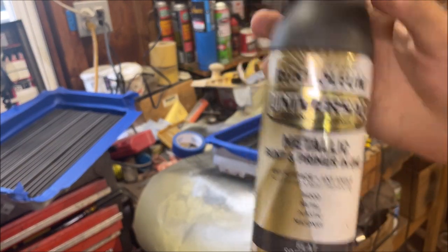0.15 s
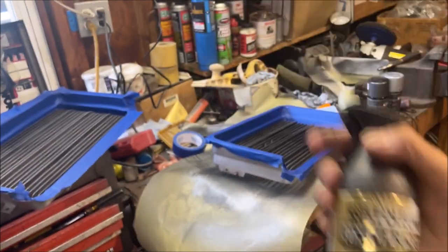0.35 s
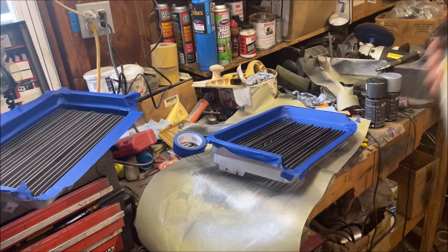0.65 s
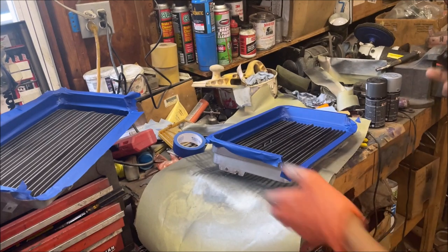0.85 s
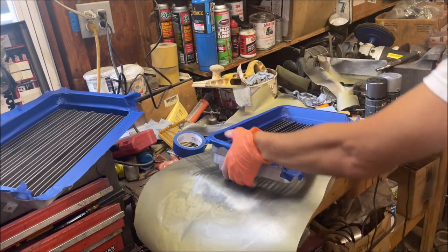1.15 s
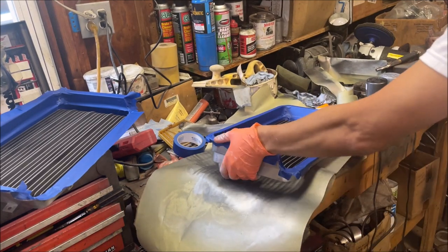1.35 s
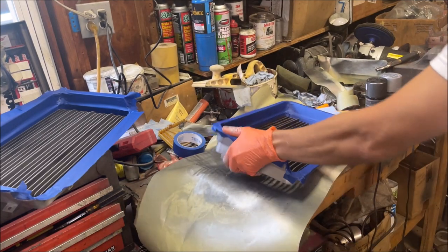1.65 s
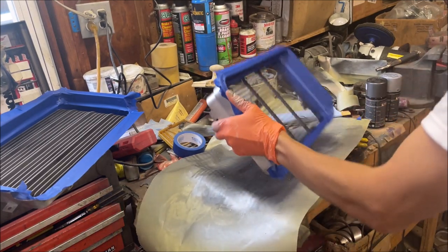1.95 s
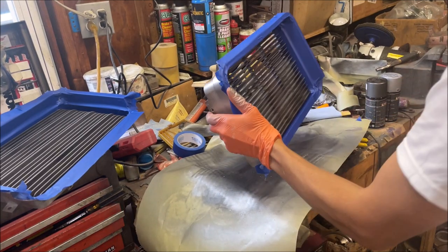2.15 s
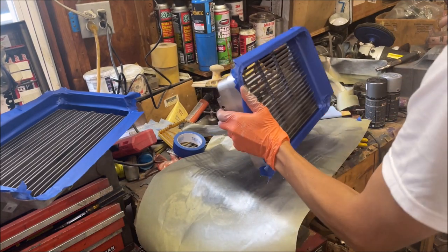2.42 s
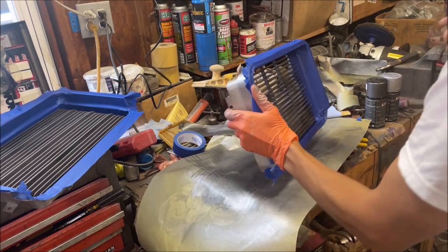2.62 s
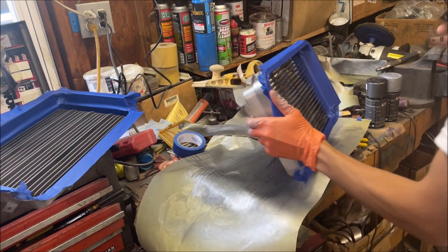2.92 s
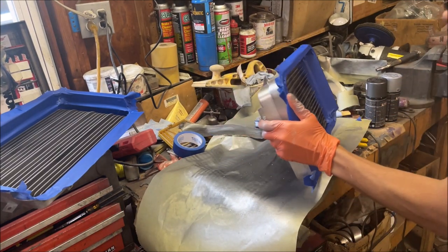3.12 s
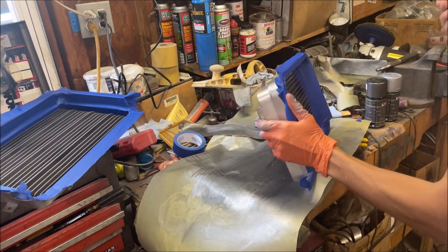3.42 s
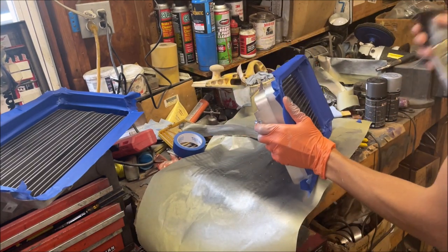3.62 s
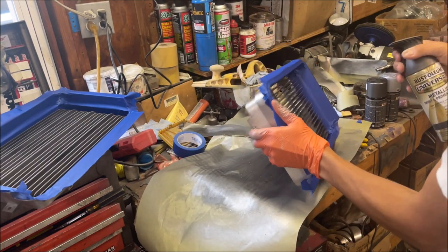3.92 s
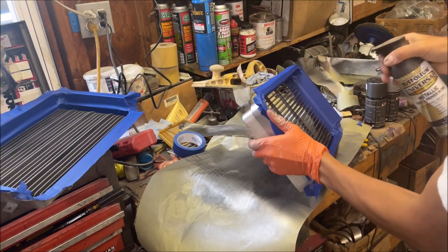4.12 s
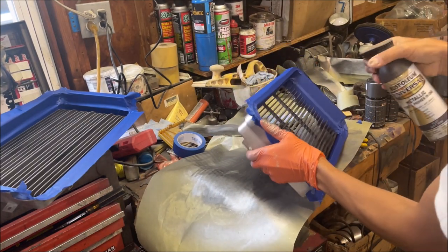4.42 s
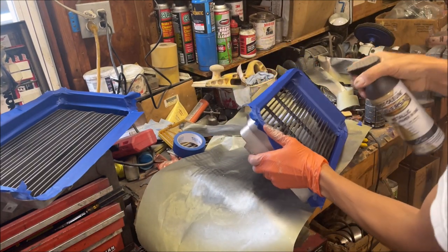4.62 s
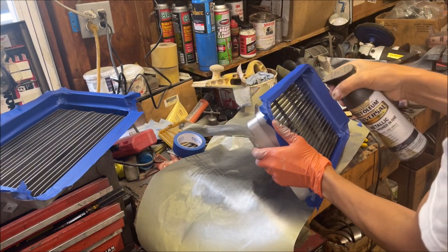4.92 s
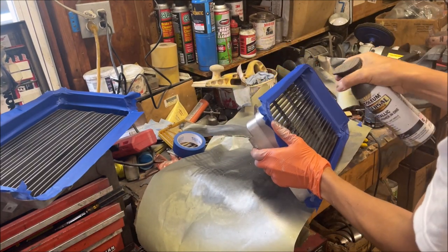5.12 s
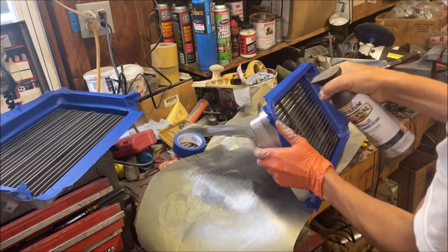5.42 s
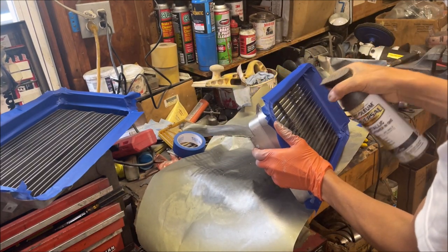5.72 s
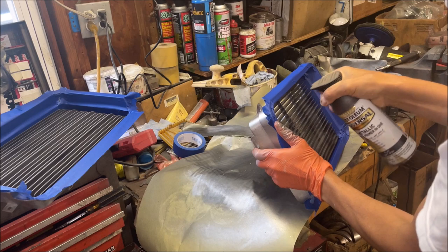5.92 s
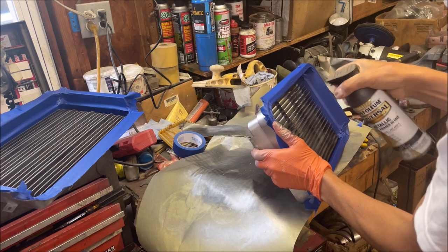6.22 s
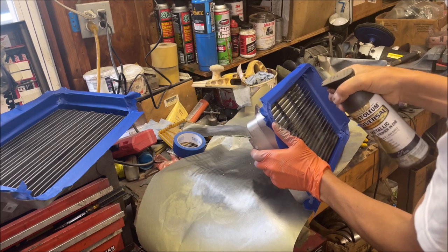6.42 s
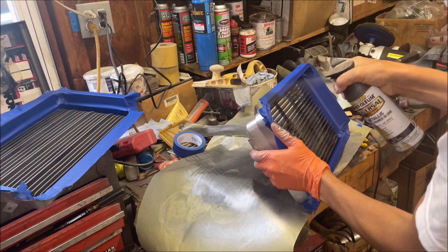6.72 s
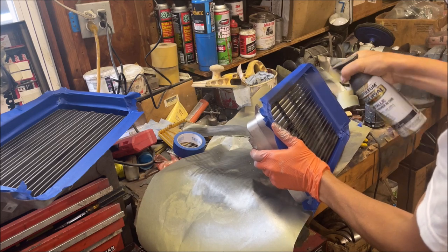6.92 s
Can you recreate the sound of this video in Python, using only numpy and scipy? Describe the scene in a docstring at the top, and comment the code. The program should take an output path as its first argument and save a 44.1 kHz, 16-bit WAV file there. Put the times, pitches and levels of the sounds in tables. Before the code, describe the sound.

In a workshop with a steady low hum, someone handles a can of spray paint near the microphone, after a brief dull rush of noise. They shake it, making an uneven metallic rattle with wet sloshing that weakens toward the end. Small clicks from fingers and trigger follow, then two faint puffs of spray and a stronger, longer hiss with a slight whistle.

```python
"""A dull rush fades off to the right, over a workshop's rumble and machine hum; a hand slides on a can.
The spray can is shaken: its mixing ball knocks on the paint-damped steel ends, the paint sloshes
and plops. Then the trigger ticks and three bursts of spray hiss onto a tray, the last faintly
whistling. Left and right carry much the same bass and treble, the treble a little apart in time."""
import sys
import numpy as np
from scipy import signal
from scipy.fft import rfft, irfft, next_fast_len
from scipy.io import wavfile

SR = 44100
rng = np.random.default_rng(int(sys.argv[2]) if len(sys.argv) > 2 else 0)


def inscribe(sig):
    """Save sig as 16-bit PCM at rate SR to the path in sys.argv[1].

    A 1-D sig is mono; a 2-D sig holds one channel per row.
    Samples are clipped to [-1, 1] before scaling.
    """
    pcm = np.round(np.clip(np.atleast_2d(sig).T, -1, 1) * 32767)
    wavfile.write(sys.argv[1], SR, pcm.astype(np.int16))


N = 311346


def from_db(db):
    """Gain of a level in dB."""
    return 10 ** (np.asarray(db) / 20)


def rms_one(x):
    """Scaled to rms 1."""
    return x / np.sqrt(np.mean(x ** 2) + 1e-20)


def in_time(rows):
    """Each column of a timed curve at every sample."""
    seconds, *columns = np.transpose(rows)
    return [np.interp(np.arange(N) / SR, seconds, column) for column in columns]


def at_hz(points, hz):
    """A table read on a log-frequency axis."""
    known_hz, values = np.transpose(points)
    return np.interp(np.log(hz), np.log(known_hz), values)


def drift(rate_hz):
    """A slow random wander of rms 1."""
    pole = np.exp(-80 * np.pi * rate_hz / SR)   # one step every 40 samples
    slow = signal.lfilter([1], [1, -2 * pole, pole * pole], rng.standard_normal(N // 40 + 2002))[2000:]
    return np.interp(np.arange(N) / 40, np.arange(len(slow)), rms_one(slow))


def dying(length, t60):
    """An exponential fall of 60 dB in t60 seconds."""
    return from_db(-60 * np.arange(length) / (t60 * SR))


def bank(drive, lowest_hz, part=slice(None)):
    """Band-passes fed by drive(hz, noise), summed with alternating signs so a click stays whole."""
    edges_hz = 30 * 2 ** np.arange(0, 9.4, .4)
    out = np.zeros((2, N))
    white = rng.standard_normal((2,) + out[:, part].shape)
    for k, (low, high) in enumerate(zip(edges_hz, edges_hz[1:])):
        if high > lowest_hz:
            band = signal.butter(2, [low, high], "band", fs=SR, output="sos")
            out[:, part] += (-1) ** k * signal.sosfilt(band, drive(np.sqrt(low * high), white[k % 2]))
    return out


def hiss(curve, colour, gain_db, pivot_hz, patchy_db, texture=1):
    """Coloured noise along a curve of time, level and tilt; each band wanders by patchy_db."""
    part = slice(round(curve[0][0] * SR), round(curve[-1][0] * SR))
    level_db, tilt_db = (column[part] for column in in_time(curve))
    gain = (texture * np.ones(N))[part] * from_db(level_db + gain_db)

    def drive(hz, noise):
        band_db = at_hz(colour, hz) + tilt_db * np.log2(hz / pivot_hz)
        return noise * gain * from_db(band_db + patchy_db * drift(28)[part])

    return bank(drive, 300, part)


def dull_rush():
    """A dull rush of noise off to the right that fades within the first second."""
    # Each row: time in seconds, relative level in dB, tilt in dB per octave.
    curve = [(0, -38, -4.5), (.15, -48.5, -3), (.32, -43, -5), (.5, -51, -5), (.75, -72, -8)]
    # Each row: frequency in Hz, relative noise density in dB.
    colour = [(250, 8), (400, -6), (680, 3), (900, -14), (1300, -3), (2000, -20), (4000, -45)]
    return hiss(curve, colour, gain_db=7.5, pivot_hz=700, patchy_db=0) * from_db([[-9], [0]])


def workshop(rumble_db, patchy_db, waver_db, waver_rad):
    """The room all round the microphone: broad rumble, with motor and mains lines that waver."""
    # Each row: frequency in Hz, relative density of the rumble in dB.
    colour = [(30, -28.5), (48, -8.5), (62, -1), (85, -13), (160, -13.5), (215, -8), (275, -12.5),
              (400, -11.5), (620, -16.5), (800, -15.5), (1500, -27), (2500, -28.5), (4500, -49.5),
              (8000, -50.5), (16000, -58)]
    # Each row: pitch of a hum line in Hz, rms level in dB that it wavers about.
    lines = [(59.3, -60), (69.2, -57.5), (119.7, -59), (138.6, -63), (177.9, -57), (207.6, -72),
             (224, -65.5), (237.6, -61.5), (296.2, -69.5), (342, -67), (357, -70), (468, -68), (588, -71),
             (709, -69)]
    rumble = bank(lambda hz, noise: noise * from_db(at_hz(colour, hz) + patchy_db * drift(6.7)), 0)
    t, hum = np.arange(N) / SR, np.zeros(N)
    for hz, db in lines:
        size = np.sqrt(2) * from_db(db + waver_db * drift(2.6))
        hum += size * np.sin(2 * np.pi * (hz * t + rng.random()) + waver_rad * drift(1.3))
    return from_db(rumble_db) * rms_one(rumble) + hum


def hand_slide():
    """A hand rubs over the can in a few soft swishes."""
    # Each row: time in seconds, relative level in dB, tilt in dB per octave.
    curve = [(0.05, -85, -9.5), (0.098, -61, 2), (0.14, -73, -6), (0.345, -57, 0), (0.46, -64, 2),
             (0.498, -51, 6), (0.58, -63, -1.5), (0.705, -74.5, 4), (0.8, -55, 4)]
    # Each row: frequency in Hz, relative noise density in dB.
    colour = [(800, -10), (2000, 5), (5000, -0.5), (8000, -0.5), (11000, -7), (16000, -14)]
    return hiss(curve, colour, gain_db=2.5, pivot_hz=6000, patchy_db=3.5)


def finger_ticks(t60=0.027, ping_hz=3180, ping_db=-6, hollow_hz=2250):
    """Hand and trigger tap the can: light, short blows for struck_can."""
    # Each row: start in seconds, relative level in dB, dull and bright parts in dB.
    ticks = [(0.282, -51, -15, -11), (0.35, -41.5, -2, -32), (0.721, -47, -33, -20),
             (5.125, -59.5, -1.5, -4), (5.1844, -57.5, 0, -14), (5.38, -58.5, 4, -24),
             (5.4947, -55, 2, -15), (5.53, -51, -1, -8), (5.5835, -44, 1.5, -24), (5.6302, -46, -2, -28),
             (5.646, -54, -12, -30), (5.659, -59, -14, -30), (5.668, -57, -12.5, -30), (5.878, -73, -4, -7),
             (5.902, -53, -1.5, -26), (5.9459, -55, -1, -17), (6.34, -55, -2, -30), (6.359, -61, -9, -32)]
    return [(start, db, dull_db, dull_db + 1, ping_db, (ping_db + bright_db) / 2, bright_db,
             t60, 0, ping_hz, ping_db, hollow_hz) for start, db, dull_db, bright_db in ticks]


def steel_mode(at, sizes, hz, t60):
    """Clicks set one mode of the can ringing."""
    clicks = np.full(N, 1e-18)
    clicks[at] = sizes
    pole, turn = from_db(-60 / (t60 * SR)), 2 * np.pi * hz / SR
    return signal.lfilter([0, np.sin(turn)], [1, -2 * pole * np.cos(turn), pole * pole], clicks)


def pings(at, levels_db, pitches_hz, spread, t60, held_s):
    """Where a blow lands decides which mode is loudest: a short tone with three weaker neighbours."""
    out, span = np.zeros(N), int(.1 * SR)
    t = np.arange(span) / SR
    shape = dying(span, t60) * (.3 + .7 * np.exp(-(t / held_s) ** 4))   # the paint smothers it
    for i, db, hz, detune in zip(at, levels_db, pitches_hz, rng.standard_normal((len(at), 3, 1))):
        neighbours = np.sin(2 * np.pi * hz * (1 + spread * detune) * t).sum(axis=0)
        tones = np.sin(2 * np.pi * hz * t) + 0.57 * neighbours
        out[i:i + span] += 0.19 * from_db(db) * tones * shape
    return out


def struck_can(blows, crack_db, echo_db, ring_db, room_db, scatter_db):
    """Each blow: a crack and its echo off the bench, the wet steel's damped ring, the room's tail."""
    # Each row: frequency in Hz, relative density of a blow in dB.
    colour = [(450, -12), (800, 4.5), (1400, 5), (2200, 3.5), (3300, 0.5), (4600, -1.5), (6500, 0.5),
              (9000, 6.5), (12000, 4.5), (16000, 6)]
    # Each row: frequency in Hz, factor on a blow's decay time.
    damping = [(400, 2.9), (1500, 1.12), (4000, 2.06), (5800, 0.85), (8000, 0.38), (15000, 0.86)]
    # Each row: pitch of a clear mode in Hz, relative level in dB, seconds to fall 60 dB.
    can_modes = [(1142, -21.5, 0.06), (2140, -16, 0.021), (3310, -40.5, .07), (3990, -23, 0.24),
                 (5030, -20.5, 0.082), (4840, -24, 0.088), (6470, -6, 0.022)]
    # Each row: frequency in Hz, the room's reverberation time in seconds.
    room_t60 = [(400, 0.071), (2000, 0.33), (4500, 0.37), (6500, 0.25), (15000, 0.0515)]
    # Centres in Hz of a blow's dull, low-mid, main, high, top and bright parts.
    part_hz = [1300, 2200, 3356, 5072, 6694, 11100]
    (start, level_db, dull_db, mid_db, high_db, top_db, bright_db,
     t60, hard_db, ping_hz, ping_db, hollow_hz) = np.transpose(blows)
    parts_db = np.array([dull_db, mid_db, np.zeros(len(start)), high_db, top_db, bright_db])
    at = np.round(start * SR).astype(int)
    span, bench_lag = int(.14 * SR), int(.0041 * SR)
    scatter = iter(rng.standard_normal((len(at), 40)).T)
    t = np.arange(span) / SR
    swell = 1 - np.exp(-(t / .0021) ** 2)   # the ring takes a moment to spread over the steel
    swell *= .48 + .52 * np.exp(-(t / .0105) ** 4)   # and drops once the ball stops chattering

    def blow_db(hz):
        shares = [np.interp(np.log(hz), np.log(part_hz), one) for one in np.eye(len(part_hz))]
        return level_db + shares @ parts_db

    def drive(hz, noise):
        sizes = from_db(blow_db(hz) + at_hz(colour, hz) + scatter_db * next(scatter))
        clicks, cracks, ring_power = np.zeros(N), np.zeros(N), np.zeros(N + span)
        clicks[at] = sizes
        cracks[at] = sizes * from_db(crack_db + hard_db - 1.46 * np.log2(hz / 4000))
        for i, size, decay_s in zip(at, sizes, t60):
            ring_power[i:i + span] += (size * swell * dying(span, decay_s * at_hz(damping, hz))) ** 2
        # reflections build up over some milliseconds, then fall with the room's decay
        rise, fall = np.exp(-1 / (.0028 * SR)), from_db(-120 / (at_hz(room_t60, hz) * SR))
        room_power = signal.lfilter([1 - rise], np.convolve([1, -fall], [1, -rise]), clicks ** 2 + 1e-18)
        level = np.sqrt(from_db(ring_db) ** 2 * ring_power[:N] + from_db(room_db) ** 2 * room_power)
        return cracks + from_db(echo_db) * np.roll(cracks, bench_lag) + level * noise

    modes = sum(steel_mode(at, from_db(blow_db(hz) + db + 1.9 * next(scatter)), hz, decay_s)
                for hz, db, decay_s in can_modes)
    after_crack = at + int(.0015 * SR)
    cluster = pings(after_crack, level_db + ping_db + 7, ping_hz, spread=.088, t60=.092, held_s=.011)
    # the crack itself carries a pitch just above the ping
    snap = pings(at, level_db + ping_db - 1.5, 1.11 * ping_hz, spread=.038, t60=.0089, held_s=.05)
    hollow = pings(after_crack, level_db + dull_db + .5, hollow_hz, spread=.078, t60=.18, held_s=.026)
    return bank(drive, 300) + modes + cluster + snap + hollow


def paint_slosh(grains_per_s, grain_db):
    """Paint splashes about inside the can: noise roughened by short grains."""
    # Each row: time in seconds, relative level in dB, tilt in dB per octave.
    curve = [(0.78, -52, -1), (0.86, -49, -0.5), (1.0, -50, -2), (1.13, -31.5, -6), (1.2, -47, -2),
             (1.286, -41, -6), (1.656, -37.5, -4.5), (1.824, -35, -4.5), (1.94, -40.5, -5.5),
             (2.03, -44, -3), (2.19, -44.5, -5), (2.235, -49, -6), (2.32, -37.5, -6.5), (2.41, -43, -3),
             (2.6, -42.5, -3), (2.69, -46, -3), (2.79, -46.5, -3), (2.9, -53.5, -0.5), (3.0, -41.5, -5.5),
             (3.11, -42, -4.5), (3.22, -47, -3.5), (3.33, -47, -1), (3.43, -40, -4), (3.48, -47, -2.5),
             (3.58, -40.5, -4), (3.742, -45.5, -6.5), (4.052, -41.5, -7), (4.28, -55.5, -5.5),
             (4.41, -42, -8.5), (4.55, -55, -7.5), (4.78, -58, -13), (5.0, -77.5, -6)]
    # Each row: frequency in Hz, relative noise density in dB.
    colour = [(350, -17.5), (800, -2.5), (1600, -1.5), (3500, -2), (6000, -3), (9000, -3.5), (16000, -12)]
    born = rng.random(N) < grains_per_s / SR
    sizes = from_db(grain_db * np.minimum(rng.exponential(1, N), 2.5))
    grains = signal.lfilter([1], [1, -.994], born * sizes)
    return hiss(curve, colour, gain_db=2, pivot_hz=1770, patchy_db=3.5, texture=rms_one(2.9 + grains))


def ball_knocks(t60=0.11):
    """The ball's blows for struck_can: the base pings high, the wet shoulder knocks dull."""
    # Each row: start in seconds, relative level in dB, dull, low-mid, high and top parts in dB,
    # contact hardness in dB, ping pitch in Hz, relative ping level in dB, hollow note in Hz.
    knocks = [(0.8115, -19.5, -11.5, -16, -1.5, -1, 0.5, 4780, -0.5, 1014),
              (0.9007, -31.5, 3, 2, -6, -4, 6.5, 3400, -3, 2380),
              (0.9862, -50.5, 4, -4, 4, -6, 5.5, 3220.0, -3, 1380.0),
              (1.0462, -17, -13.5, -12.5, -4.5, -5, 0.5, 4750, -5, 2390),
              (1.1075, -31, 4.5, 3, 1, -10, 0.5, 2850, -10.5, 980),
              (1.1404, -35, 9, 2, -3.5, 1.0, 2.5, 6970, 2, 1235),
              (1.1524, -30, 1, -4.5, -6, -5, 3, 3330, -2, 1270),
              (1.165, -35.5, -2.5, -1, -1, -9.5, 4.5, 3410, -5, 1290),
              (1.2332, -23.5, -10.5, -13, 1.5, -0.5, 0, 3270, -13, 1396),
              (1.2384, -15.5, -19, -16, -15, -10.5, -6.5, 3157, -4.5, 2430),
              (1.278, -26.5, -3, -6, -9, -14, -3.5, 4100.0, -7, 2460),
              (1.3834, -34.5, 5.5, 8.5, -12, -10, 1.5, 3330, -6.5, 2330),
              (1.3878, -31.5, -16.0, -19, -7.5, -2, 3.5, 3300, 1.5, 1560.0),
              (1.4577, -20, -11.5, -9, -9, -5.5, -4.5, 4530, -3.5, 1720.0),
              (1.4627, -14.5, -27.5, -24, -3.5, -6.5, -2, 4620, -8.5, 855),
              (1.5716, -31.5, 5, 3.5, -3, -14.0, -4, 2800, -9.5, 1130),
              (1.6034, -27.5, -0.5, -3, -7, -12.5, -1, 3770, -0.5, 2240),
              (1.6684, -47, -3.5, 4, 3.5, -4.5, 0, 4920.0, -1, 1920.0),
              (1.702, -25, -7, 1, -1.5, 1.5, 1.5, 2700, -13.5, 2350),
              (1.727, -22.5, -30, -7, -1.5, -8.5, -1.5, 3100.0, -8.5, 2430.0),
              (1.868, -32.5, -1.5, 5, -6, -5.5, 1, 3470, -7, 2260),
              (1.965, -20.5, -15.5, -7, 0, 0.5, 1.5, 6000, 0.5, 1980.0),
              (2.15, -32.5, -7, -3, -4.5, -3.5, -1, 2540, -2.5, 2340),
              (2.254, -20, -16, -14.5, -4.5, -2.5, -0.5, 4690, -1.5, 1660),
              (2.3403, -30, -7.5, -3, -18.5, -7, 3.5, 3480, -4, 2340),
              (2.4186, -17.5, -19, -10, -3.5, -6, 3.5, 4040, -12.5, 2480),
              (2.562, -30, -0.5, 0, -24.5, -0.5, -0.5, 3700, -1, 2420),
              (2.6583, -26.5, -13, -5.5, 1.5, 5, 3, 6600, 1.5, 2220),
              (2.7632, -27.5, -1.5, -4.5, -11, -7.5, -1, 3890, -2.5, 2410),
              (2.8537, -20, -19, -10, 2.5, -1.5, 0.5, 4230, -1, 2290.0),
              (2.9841, -30.5, -1.5, -1.5, -12, -2.5, 2, 3580, -9, 774),
              (3.05, -50, 5.5, 14, 5.5, 2, 0.5, 2630, 2.5, 1620),
              (3.078, -17.5, -15, -14.5, 1, -10, 1.5, 4310, 2.0, 1900),
              (3.1767, -29, -2, 5, -12.5, -2.5, 1.5, 2920, -18, 2330),
              (3.28, -17, -18, -9, 1.5, -3.5, 0, 4350, -4, 2140),
              (3.4022, -35, 5, 6.5, 0.5, -1.5, 2.5, 2830, -18.5, 1870),
              (3.5044, -21.5, -15, -8.5, 3.5, 0, -0.5, 5040, 1, 2040),
              (3.6348, -32, 3.5, -5, -12, -1, -11, 3080, -3, 924),
              (3.6464, -29.5, -1, 3, -9, -11, 2, 3490, -8, 2270),
              (3.7, -39, -4.5, -11, 4.5, -13, 7, 3360.0, 5.5, 700),
              (3.8298, -35, -4, -1, 0.5, -1.5, 3, 2970, -2.5, 700),
              (3.9348, -35.5, 4.5, -5, -3, -9, -16, 2620, -14, 894),
              (3.96, -30, -3.5, -11, -4.5, -14.5, 2, 2700, -4, 900),
              (4.0003, -47, -11, 4, 5, -14, 3.5, 3500, -1, 1830.0),
              (4.128, -35.5, 0.5, 2.5, -11, -18, -14, 2840, -7, 795),
              (4.142, -27, -1.5, -12, -4, -7, 1, 3330, -3, 1055),
              (4.205, -39, -0.5, -4, -13, -4, 1.5, 3270, -5.5, 2000),
              (4.4855, -47, -2, 0, -1, -16.5, 1, 2990.0, -5, 2290),
              (4.6178, -41, 1, -3, -0.5, -4, -0.5, 2670, 0.5, 750.0),
              (4.6665, -36, 7, 0, -0.5, -4, -3.5, 2680, 2, 1282),
              (4.8607, -49.5, 14, 6.5, -9, -36, -1.5, 2670, -6, 1235)]
    blows = []
    for start, db, *parts_db, hard_db, ping_hz, ping_db, hollow_hz in knocks:
        bright_db = -22 + 1.75 * hard_db   # a harder contact is brighter
        blows.append((start, db, *parts_db, bright_db, t60, hard_db, ping_hz, ping_db, hollow_hz))
    return blows


def paint_plops(gain_db, spread, splash_db, t60):
    """Paint plops back as the ball turns: three close, short tones in a splash of noise."""
    # Each row: start in seconds, relative level in dB, pitch in Hz.
    plops = [(0.8589, -22, 1478), (0.887, -28, 1560), (.988, -36.5, 1400), (1.007, -30, 1430),
             (1.089, -27.5, 1430), (1.216, -28, 1346), (1.551, -30, 970), (1.787, -35, 1430),
             (1.825, -33.5, 980), (2.008, -31, 1790), (2.074, -27.5, 1670), (2.096, -34, 1740),
             (2.152, -33, 1360), (2.184, -33.5, 1340), (2.2915, -27.5, 1210), (2.292, -26.5, 1970),
             (2.387, -35, 2100), (2.444, -28, 1910), (2.5253, -24.5, 1580), (2.5261, -28, 1070),
             (2.615, -31.5, 1290), (2.637, -31, 1640), (2.709, -33, 1250), (2.725, -31, 1390),
             (2.817, -37.5, 1560), (2.842, -30.5, 1610), (2.937, -33, 2100), (2.938, -34.5, 1100),
             (3.143, -30, 1910), (3.213, -38.5, 1140), (3.271, -30.5, 1920), (3.369, -32.5, 1470),
             (3.3688, -34, 844), (3.461, -38.5, 1190), (3.493, -31.5, 2000), (3.576, -37, 1990),
             (3.595, -33.5, 1140), (3.69, -26, 1476), (3.791, -50, 1630), (4.076, -39.5, 835),
             (4.167, -26, 717)]
    out, span = np.zeros((2, N)), int(.08 * SR)
    t = np.arange(span) / SR
    for (start, db, hz), detune in zip(plops, rng.standard_normal((len(plops), 3, 1))):
        tones = np.sin(2 * np.pi * hz * (1 + spread * detune) * t).mean(axis=0) * dying(span, t60)
        band = signal.butter(2, [hz * .65, hz * 1.4], "band", fs=SR, output="sos")
        splash = signal.sosfilt(band, rng.standard_normal((2, span))) * dying(span, 2 * t60)
        i = round(start * SR)
        out[:, i:i + span] += from_db(db + gain_db) * (tones + from_db(splash_db) * splash)
    return out


def trigger():
    """The jet's level and tilt: each squeeze opens, rises, sags and falls; the strongest is heard."""
    # Each row: start in seconds, rise in seconds, relative peak in dB, hold and fall in seconds.
    squeezes = [(5.416, 0.12, -60.5, 0.047, .14), (5.91, 0.042, -63.5, 0.19, .3),
                (6.419, 0.08, -55, 0.09, 0.26), (6.53, 0.07, -47.5, .45, .1)]
    shut_db, opening_db, opening_s = -91.5, -75, .024
    sag_db_per_s, tilt_per_s = 15, 13.3   # the jet weakens and brightens while held
    release_db, release_s = 2, .026   # letting go drops the jet at once, then it dribbles out
    t = np.arange(squeezes[0][0] - opening_s, N / SR, .002)
    level, tilt = np.full(len(t), shut_db), np.zeros(len(t))
    for start, rise, db, held, fall in squeezes:
        corners = start + np.cumsum([-opening_s, opening_s, rise, held, release_s, fall])
        end_db = db - sag_db_per_s * held
        own_level = np.interp(t, corners, [shut_db, opening_db, db, end_db, end_db - release_db, shut_db])
        own_tilt = np.interp(t, corners, [0, 0, 0, tilt_per_s * held, 0, 0])
        tilt = np.where(own_level > level, own_tilt, tilt)
        level = np.maximum(own_level, level)
    return np.transpose([t, level, tilt])


def spray():
    """Smooth jet noise; inverted bounces off the tray comb it into bands that glide as the can sweeps."""
    # Each row: frequency in Hz, relative noise density in dB.
    colour = [(500, 3), (1500, -6.5), (3000, -0.5), (5000, 0), (8000, 2), (10500, -5.5), (13000, 8),
              (16000, -30)]
    # Each row: time in seconds, detour by way of the tray in metres, share sent back.
    tray_echo = [(5.4, 0.18, 0.26), (5.9, 0.18, 0.065), (6.5, 0.18, 0.064), (6.63, 0.17, 0.19),
                 (6.76, 0.163, 0.22), (6.86, 0.11, 0.22), (7.06, 0.13, 0.24)]
    jet = hiss(trigger(), colour, gain_db=6.5, pivot_hz=7970, patchy_db=1.5)
    detour_m, share = in_time(tray_echo)
    now, lag = np.arange(N), detour_m / 343 * SR
    return sum((-share) ** bounce * np.array([np.interp(now - bounce * lag, now, side) for side in jet])
               for bounce in range(6))


def nozzle_whistles(width_hz):
    """The nozzle whistles faintly: narrow bands of noise that swell, glide and fade."""
    # Each row: start and length in seconds, first and last pitch in Hz, level at the crest in dB.
    whistles = [(6.58, .2, 2950, 3350, -60), (6.59, .13, 6450, 6600, -60), (6.66, .13, 5280, 5450, -57),
                (6.63, .06, 4400, 4500, -63), (6.58, .2, 9900, 10000, -60), (6.72, .2, 11000, 11700, -57),
                (6.82, .24, 4100, 4500, -64), (6.86, .2, 11800, 12500, -62)]
    out = np.zeros(N + SR)
    lowpass = signal.butter(2, width_hz, fs=SR, output="sos")
    for start, length, from_hz, to_hz, db in whistles:
        progress = np.linspace(0, 1, round(length * SR))
        wobble = signal.sosfilt(lowpass, rng.standard_normal((2, SR // 2)))[:, -len(progress):]
        phase = 2 * np.pi * np.cumsum(from_hz + (to_hz - from_hz) * progress) / SR
        tone = rms_one(wobble[0] * np.cos(phase) + wobble[1] * np.sin(phase))
        i = round(start * SR)
        out[i:i + len(tone)] += from_db(db) * np.sin(np.pi * progress) * tone
    return out[:N]


def scene():
    """The workshop in two channels: the same events, with separate broad noise in each."""
    rattle = struck_can(ball_knocks() + finger_ticks(),
                        crack_db=21.5, echo_db=-15.5, ring_db=3, room_db=-8, scatter_db=1)
    paint = paint_plops(gain_db=-1.5, spread=.08, splash_db=3, t60=.042)
    paint += paint_slosh(grains_per_s=90, grain_db=6.5)
    hand, rush = hand_slide(), dull_rush()
    jet = spray() + nozzle_whistles(width_hz=120)
    room = workshop(rumble_db=-51.5, patchy_db=1.5, waver_db=2.5, waver_rad=.66)
    return rush + room + hand + rattle + paint + jet


def record(dry):
    """Stereo image: the right channel shares much of the left and leads in the treble; the top is cut."""
    # Each row: frequency in Hz, gain on both channels in dB.
    response = [(7000, 0), (7900, 3), (8700, 0), (12700, -1), (13600, 0), (14300, 0), (14900, -6),
                (16300, -9)]
    # Each row: frequency in Hz, likeness of left and right from 0 to 1.
    likeness = [(60, 0.96), (160, 0.96), (300, 0.75), (600, 0.3), (1200, 0.35), (2600, 0.4), (5000, 0.54),
                (7000, 1), (8100, .998), (9600, 0.82), (11600, 1), (13200, 0.84), (14800, 1)]
    # Each row: frequency in Hz, left over right in dB.
    balance = [(60, 0), (1000, 1), (2000, 1), (3500, 4), (5500, 2.5), (7500, 0), (16000, 0)]
    lead_s, lead_from_hz, stopband_hz = .00017, 5370, 17150
    size = next_fast_len(N + 4096)
    hz = np.maximum(np.arange(size // 2 + 1) * SR / size, 1)
    left, unshared = rfft(dry, size) * from_db(at_hz(response, hz))
    alike = np.clip(at_hz(likeness, hz), 0, .999)
    lean = from_db(at_hz(balance, hz) / 2)
    # the phase offset between the channels is held constant in the highest hiss
    lead = np.exp(1j * np.clip(2 * np.pi * lead_s * (hz - lead_from_hz), 0, 2.8 * np.pi))
    right = lead * (alike * left + 1j * np.sqrt(1 - alike ** 2) * unshared)
    stereo = irfft([left * lean, right / lean], size)[:, :N]
    top_cut = signal.cheby2(14, 70, stopband_hz, fs=SR, output="sos")
    return signal.sosfilt(top_cut, stereo)


dry = scene()
out = record(dry)
inscribe(out)
```